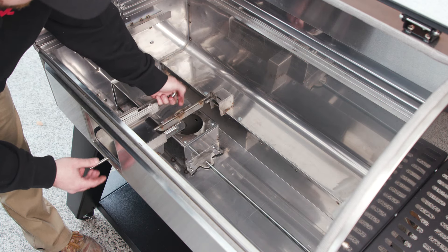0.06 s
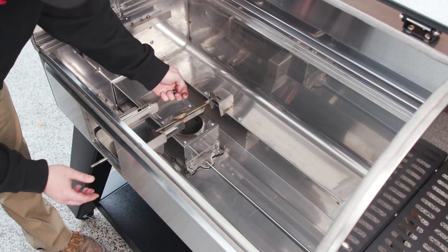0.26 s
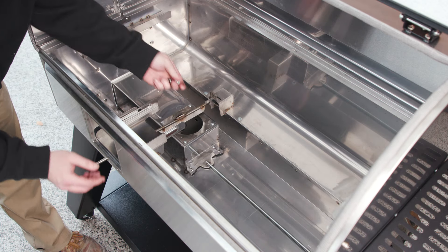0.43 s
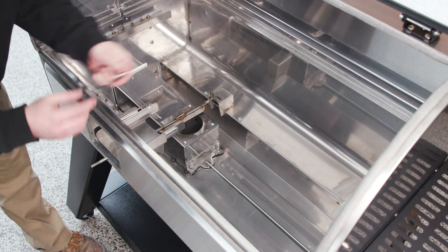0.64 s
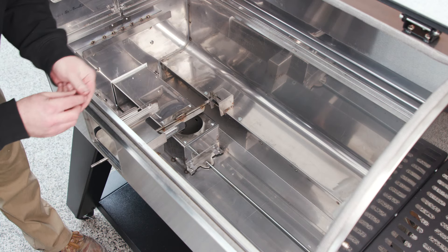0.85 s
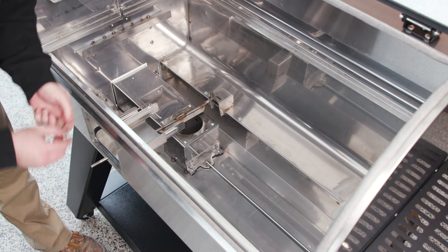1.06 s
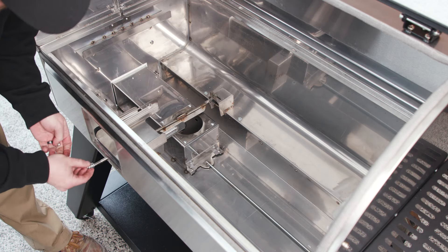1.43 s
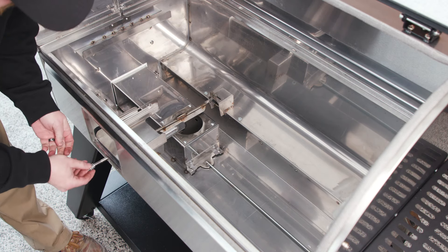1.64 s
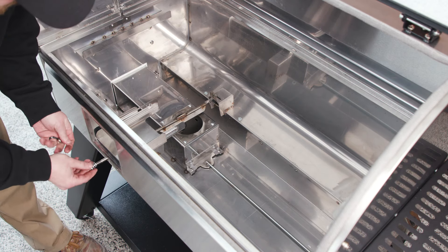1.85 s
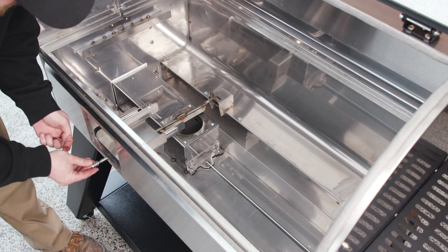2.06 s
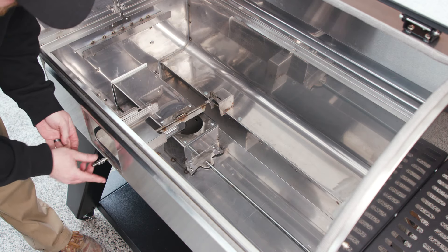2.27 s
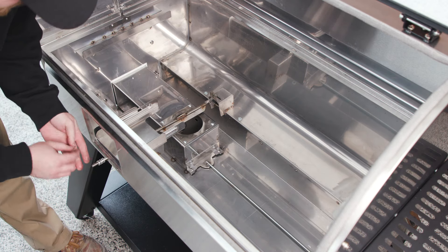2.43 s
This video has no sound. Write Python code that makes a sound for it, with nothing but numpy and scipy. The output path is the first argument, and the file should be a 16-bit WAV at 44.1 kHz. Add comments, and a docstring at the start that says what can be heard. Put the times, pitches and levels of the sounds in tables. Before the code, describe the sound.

A loose metal piece clatters inside a steel grill, then a rod knocks and scrapes through.

```python
"""Steelwork on a grill barrel

A loose steel part is set down inside a grill barrel: it clacks, rattles and settles with a faint squeak.
Then a rod knocks against the wall, ticks in its hole and is pushed through in short scrapes.
Each impact or slip excites damped modes of the steel, and the room prolongs the ring.
A low hum and the rush of ventilation fill the workshop."""
import sys
import numpy as np
from scipy import signal
from scipy.fft import rfft, irfft
from scipy.io import wavfile

SR = 44100
rng = np.random.default_rng(int(sys.argv[2]) if len(sys.argv) > 2 else 0)


def bounce(signal):
    """Save signal as a 16-bit WAV file at the path given by the first command-line argument."""
    frames = np.transpose(np.atleast_2d(signal))
    limited = np.clip(frames, -1, 1)
    pcm = np.round(limited * 32767).astype(np.int16)
    wavfile.write(sys.argv[1], SR, pcm)


N = 114660
T = np.arange(N) / SR
HZ = np.fft.rfftfreq(N, 1 / SR)

# Spectra of struck steel, rubbed steel and ventilation. Each row: frequency in Hz, relative density in dB.
IMPACT_SPECTRUM = [(40, -46), (110, -11.5), (200, -9.5), (330, -2.5), (600, -2), (900, -4), (1300, -12),
                   (2000, -18), (2900, -15), (4200, -17.5), (7800, -16), (12000, -24), (16000, -34)]
FRICTION_SPECTRUM = [(100, -46), (300, -18), (520, -13.5), (720, -16.5), (870, -7.5), (1100, -18),
                     (1550, -20.5), (2200, -24.5), (2900, -25.5), (3700, -30), (7500, -37), (12000, -45),
                     (16000, -64)]
AIR_SPECTRUM = [(20, -59.5), (38, -49), (55, -25), (75, -17.5), (110, -16.5), (160, -30.5), (280, -31.5),
                (550, -31), (900, -33), (1500, -39.5), (2200, -48.5), (3300, -64), (5000, -70.5),
                (9000, -73.5), (16000, -76)]
# Decay of the sheet steel and of the room. Each row: frequency in Hz, time to fall 60 dB in seconds.
SHEET_T60 = [(150, 0.17), (500, 0.25), (1200, 0.2), (3000, 0.24), (8000, 0.083), (15000, 0.084)]
ROOM_T60 = [(150, 1.5), (500, 1.27), (1200, 1.1), (3000, 1), (8000, .38), (15000, .3)]
# Strength of the room's tail. Each row: frequency in Hz, level relative to the sheet in dB.
ROOM_LEVELS = [(150, -11), (500, -11), (1200, -16.5), (3000, -29), (8000, -21), (15000, -13)]
# Modes still ringing from earlier handling. Each row: frequency in Hz, initial level in dB.
FADING_MODES = [(325, -48), (397, -42), (417, -42), (528, -42), (577, -45), (853, -51)]
# Course of the hum. Each row: time in seconds, level in dB.
HUM_LEVELS = [(0, -43), (.45, -58), (.6, -39), (1.4, -44.5), (1.75, -35), (2.57, -39.5)]
# Metal sliding on metal. Each row: start and length in seconds, level in dB, tilt in dB per octave.
SCRAPES = [(0.161, 0.044, -7, -1), (1.542, 0.023, -7, 1.5), (1.806, 0.012, -21, -0.5),
           (1.978, .012, -25, 1), (2.071, 0.033, -1, 0), (2.147, 0.035, -8.5, 1), (2.188, 0.044, -4, 3),
           (2.236, 0.0347, 2, 2), (2.263, 0.0305, 3.5, 1), (2.305, 0.017, -35, 13)]
# Blows of the loose part and of the rod on the barrel.
# Each row: start in seconds, then the levels of boom, body, clang and tick in dB.
PART_CLANKS = [(.231, -1, -2, -6.5, 5), (.2352, 1, -0.5, 2.5, -5.5), (.249, -7.5, -3.5, -8, -30),
               (.274, 0, -2, -9, -21), (.302, -5.5, -1, -5.5, -19), (.3055, 3, -14, -12, -2.5),
               (.314, -4, -9, 1.5, -9.5), (.329, -21, -2, 0, -3), (.335, -18, -4, -7.5, -4.5),
               (.352, -22, -8, -26, -18), (.366, -9.5, 2.5, -10, -30), (.385, -6.5, -7, -2, -12),
               (.417, -21.5, -2, -8, -17), (.448, -10, 4, -36.5, -19.5), (.488, -7.5, -13, -14.5, -30),
               (.535, -30, -17, -28, -38.5)]
ROD_KNOCKS = [(1.538, -13, -19, -28, -47), (1.5655, 9.5, -1, -9.5, -25), (1.572, -27, 1, -7, -17.5),
              (1.588, -28, 0.5, -11, -27)]
BLOW_BANDS_HZ = (150, 550, 2500, 8000)  # boom, body, clang, tick
# Modes rung by the loose part, modes of the barrel wall and modes of the rod in its hole.
# Each row: frequency in Hz, relative level in dB, time to fall 60 dB in seconds.
PART_MODES = [(296, -39, 2.3), (310, -35, .5), (338, -30, .45), (394, -32, .35), (377, -43, 1.2),
              (424, -28, .45), (442, -42, 1.2), (466, -36, .5), (549, -36, 1.7), (565, -33, .55),
              (576, -38, 1.1), (650, -27, .42), (857, -38, .8), (1136, -43, .5), (1276, -39, .55),
              (1529, -33, .38), (1814, -44, .4), (2261, -46, .4), (2772, -39, .3), (2896, -39, .3),
              (4834, -41, .25), (5378, -45, .25), (7020, -42, .25), (7800, -44, .22)]
WALL_MODES = [(142, -38, .5), (173.5, -39, 1.7), (253, -42, .7), (445, -27, .45), (528, -32, 1.0),
              (651, -29, .45), (765, -33, .5), (829, -33, .45), (858, -32, .35), (949, -33, .5),
              (1025, -36, .55), (1303, -38, .45), (1464, -44, .7)]
ROD_MODES = [(525, -50, .7), (620, -50, .8), (721, -48, .35), (812, -43, .28), (862, -43, .28),
             (910, -46, .25), (980, -48, .25), (1266, -54, .3), (1532, -50, .4), (1900, -53, .2),
             (2605, -48, .2), (2890, -48, .2), (3120, -52, .2), (3490, -55, .17), (3860, -54, .17),
             (4390, -56, .17), (6410, -58, .17), (7330, -57, .13)]
# Partials of the squeak. Each row: harmonic number, peak level in dB.
SQUEAK_PARTIALS = [(2, -78), (3, -73), (5, -83)]
# The rod's tip in its hole. Each row: start in seconds, level in dB, ping in Hz, ping boost in dB.
ROD_TICKS = [(1.530, -23.5, 9000, 16.5), (1.7005, -13.5, 10000, 11), (1.705, -18.5, 12500, 18),
             (1.772, -23, 8000, 7), (1.827, -12, 8500, 12.5), (1.846, -10, 3020, -4), (1.874, -13, 7400, 0),
             (2.006, -15.5, 5400, 3.5)]


def amp(db):
    """Amplitude grows tenfold for every 20 dB."""
    return 10 ** (np.asarray(db) / 20)


def decay(t, t60):
    """Damping gives an exponential fall of 60 dB in t60 seconds."""
    return np.exp(-np.log(1000) * t / t60)


def read(points, hz):
    """Interpolation of a table on a logarithmic frequency axis."""
    freqs, values = np.transpose(points)
    return np.interp(np.log(hz + 1), np.log(freqs + 1), values)


def add(mix, start, sound):
    """Superposition: a sound adds to the mix from its start in seconds."""
    part = mix[max(round(start * SR), 0):][:len(sound)]
    part += sound[:len(part)]


def shaped_noise(gain):
    """Filtered white noise takes on the spectrum of the filter."""
    return irfft(rfft(rng.standard_normal(N)) * gain, N)


def drift(rate_hz):
    """Low-passed noise wanders randomly, here with unit variance."""
    wander = shaped_noise(np.exp(-(HZ / rate_hz) ** 2))
    return wander / wander.std()


def fading_ring():
    """Free decay: the barrel loses the energy left in it by earlier handling."""
    dense = shaped_noise(amp(read(IMPACT_SPECTRUM, HZ)) / (1 + (HZ / 2400) ** 4))
    tones = sum(amp(db) * np.sin(2 * np.pi * (hz * T + rng.random())) for hz, db in FADING_MODES)
    return amp(-23.5) * dense * decay(T, t60=1.1) + tones * decay(T, t60=1.5)


def workshop(hum_hz=98.1, waver=0.087):
    """Random phase and amplitude modulation make a hum waver over broadband ventilation noise."""
    envelope = np.sqrt(2) * amp(np.interp(T, *np.transpose(HUM_LEVELS)))
    hum = envelope * np.sin(2 * np.pi * hum_hz * T + waver * drift(rate_hz=11))
    air = shaped_noise(amp(read(AIR_SPECTRUM, HZ) - 0.5))
    return hum * (1 + waver * drift(rate_hz=18)) + air


def treble_ripple(depth_db=3.8, step_hz=45, full_depth_hz=1800):
    """Crowded resonances ripple the sheet's response, in dB, alike for all contacts at one place."""
    grid = np.arange(0, SR / 2, step_hz)
    depth = depth_db * np.minimum(grid / full_depth_hz, 1)
    db = depth * np.clip(rng.standard_normal(len(grid)), -2, 2)
    db -= depth ** 2 * np.log(10) / 20  # keeps the mean power about level
    return lambda hz: np.interp(hz, grid, db)


def sheet_ring(gain_db, crack_db=-10.5, crack_s=0.00067):
    """Impulse response: after a crack, dense modes and reverberation decay as noise, band by band."""
    size = 2 ** 16
    t, hz = T[:size], np.fft.rfftfreq(size, 1 / SR)
    centres = np.geomspace(120, 15000, 8)
    spectrum = np.exp(2j * np.pi * rng.random(len(hz))) * np.sqrt(size) * amp(gain_db(hz))
    out = np.zeros(size)
    for centre, share in zip(centres, np.eye(len(centres))):
        band = irfft(spectrum * read(np.c_[centres, share], hz), size)
        sheet = decay(t, read(SHEET_T60, centre))
        room = amp(read(ROOM_LEVELS, centre)) * decay(t, read(ROOM_T60, centre))
        build_up = np.minimum(t * centre, 1)  # takes one cycle
        out += band * np.hypot(sheet, room) * build_up
    return out * (1 + amp(crack_db) * np.exp(-t / crack_s))


def rod_ring(gain_db):
    """Modal synthesis: the rod answers an impulse with a sum of damped sinusoids."""
    out = np.zeros(2 * SR)
    for hz, db, t60 in ROD_MODES:
        t = T[:int(1.3 * t60 * SR)]
        tone = np.sin(2 * np.pi * hz * t) * rng.choice([-1, 1])
        out[:len(t)] += amp(db + gain_db(hz)) * decay(t, t60) * tone
    return out


def scrapes(slips_per_s=1400, spread_db=4.5, rise_share=0.45, fall_s=0.0026):
    """Sliding friction: each push is a swelling run of tiny slips that ring the barrel and the rod."""
    out, ripple = np.zeros(N), treble_ripple()
    for start, length, db, db_per_octave in SCRAPES:
        t = T[:int(length * SR)]
        chance, spread = rng.random(N)[:len(t)], rng.standard_normal(N)[:len(t)]
        push = np.clip(np.minimum(t / (rise_share * length), (length - t) / fall_s), 0, 1)
        strength = amp(spread_db * abs(spread)) * np.sign(spread)
        slips = push * (chance < slips_per_s / SR) * strength
        slips /= np.linalg.norm(slips) + 1e-9
        tilt = lambda hz: db_per_octave * np.log2(np.maximum(hz, 550) / 2500)
        barrel = sheet_ring(lambda hz: read(FRICTION_SPECTRUM, hz) + tilt(hz) + ripple(hz))
        add(out, start, amp(db) * signal.fftconvolve(slips, barrel))
        add(out, start, amp(db + 1.5) * signal.fftconvolve(slips, rod_ring(tilt)))
    return out


def blows(events, modes, modes_db=0):
    """Impact excitation: each blow rings the sheet and feeds energy to modes that damping drains."""
    out, ripple = np.zeros(N), treble_ripple()
    forces = [(start, list(zip(BLOW_BANDS_HZ, levels))) for start, *levels in events]
    for start, force in forces:
        add(out, start, sheet_ring(lambda hz: read(IMPACT_SPECTRUM, hz) + read(force, hz) + ripple(hz)))
    for hz, db, t60 in modes:
        kicks = np.zeros(N)
        for start, force in forces:
            kicks[round(start * SR)] += amp(db + modes_db + read(force, hz)) ** 2
        energy = signal.lfilter([1], [1, -decay(1 / SR, t60) ** 2], kicks)
        # a blow shifts the phase according to its share of the energy
        phase = np.cumsum(kicks / (energy + 1e-20) * rng.uniform(-2.03, 1.99, N))
        lag = np.exp(-hz / SR)  # a mode builds up over about one cycle
        swing = signal.lfilter([1 - lag], [1, -lag], np.sqrt(energy) * np.exp(1j * phase))
        out += (swing * np.exp(2j * np.pi * hz * T)).imag
    return out


def squeak(fundamental_hz=1715, waver=0.006, peak_s=0.73, width_s=0.08):
    """Frequency modulation: thin upper harmonics waver, swell and fade as the part comes to rest."""
    cycles = np.cumsum(fundamental_hz * (1 + waver * drift(rate_hz=141))) / SR
    swell = np.exp(-((T - peak_s) / width_s) ** 2)
    return swell * sum(amp(db) * np.sin(2 * np.pi * k * cycles) for k, db in SQUEAK_PARTIALS)


def rod_ticks(ping_octaves=0.35, rise_s=0.00089):
    """Grazing contact: each light touch rings sheet and rod, with a spectral peak heard as a ping."""
    out = np.zeros(N)
    for start, db, ping_hz, ping_db in ROD_TICKS:
        ping = lambda hz: ping_db * np.exp(-(np.log2((hz + 1) / ping_hz) / ping_octaves) ** 2)
        tick = sheet_ring(lambda hz: read(FRICTION_SPECTRUM, hz) + ping(hz))
        add(out, start, amp(db) * tick * np.minimum(T[:len(tick)] / rise_s, 1))
        add(out, start, rod_ring(lambda hz: db + 2))
    return out


def scene():
    """Superposition: the pressures of all sources add at one point."""
    clanks = blows(PART_CLANKS, PART_MODES)
    knocks = blows(ROD_KNOCKS, WALL_MODES, modes_db=-1)
    return (clanks + knocks + rod_ticks() + scrapes() + squeak() + fading_ring() + workshop())[None]


def record(dry, cutoff_hz=15850):
    """Band limiting: a low-pass filter removes the highest treble."""
    lowpass = signal.firwin(401, cutoff_hz, window=("kaiser", 9), fs=SR)
    return signal.oaconvolve(dry, lowpass[None], "same")


dry = scene()
out = record(dry)
bounce(out)
```